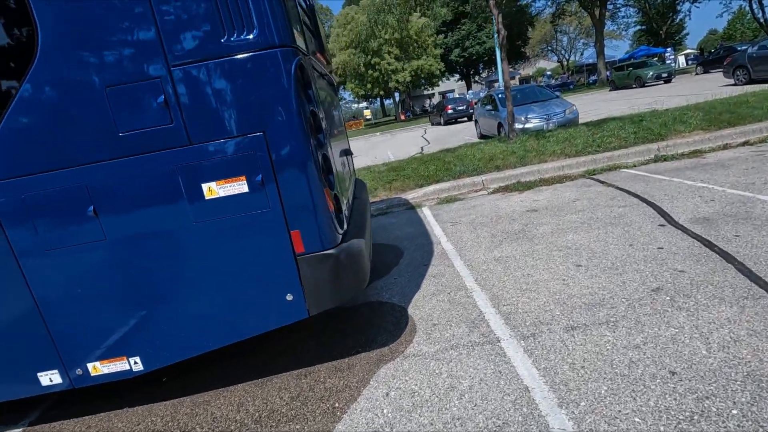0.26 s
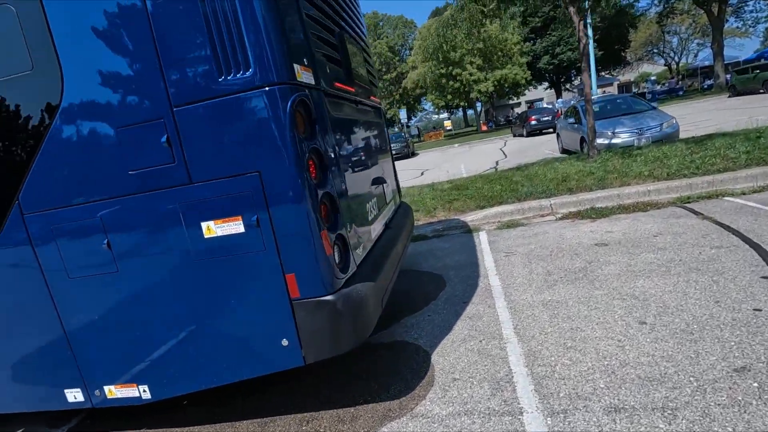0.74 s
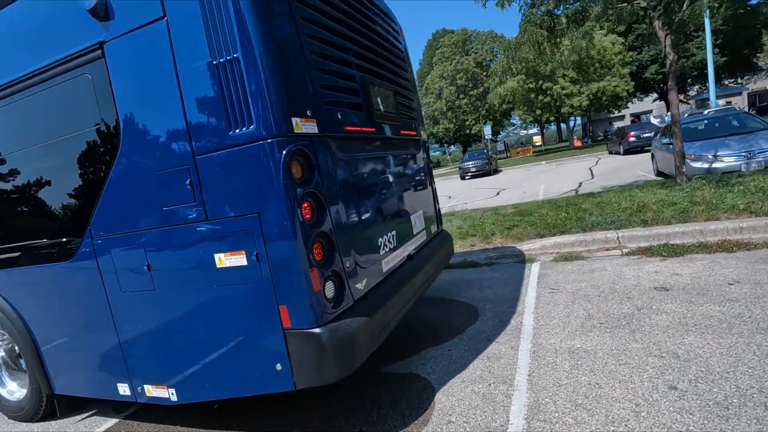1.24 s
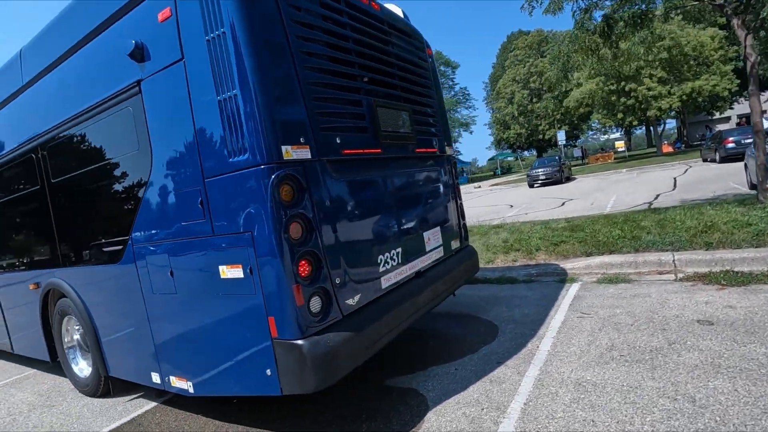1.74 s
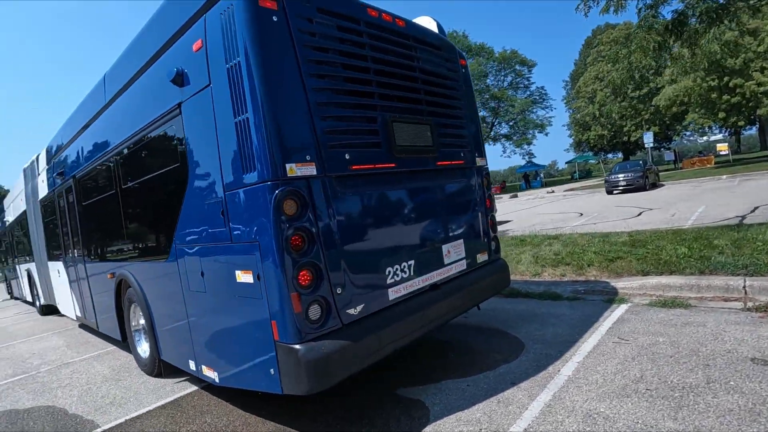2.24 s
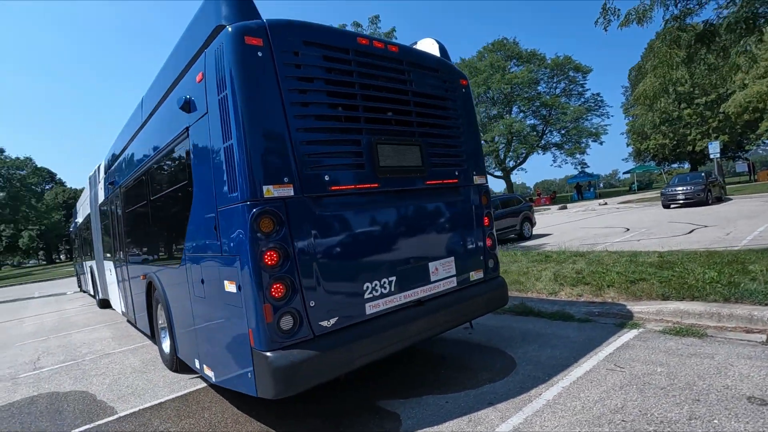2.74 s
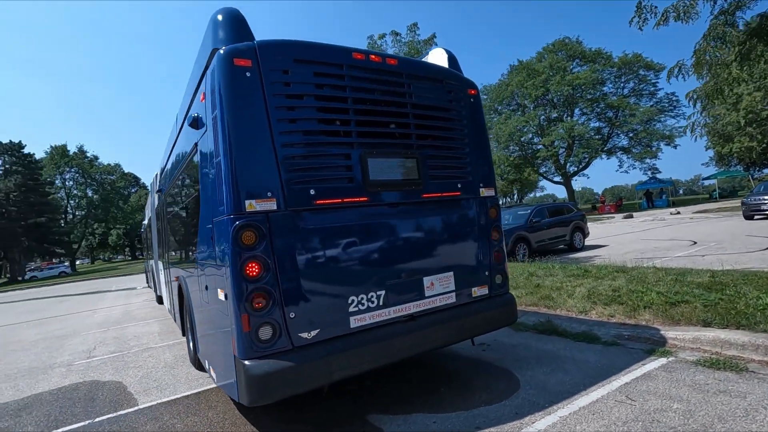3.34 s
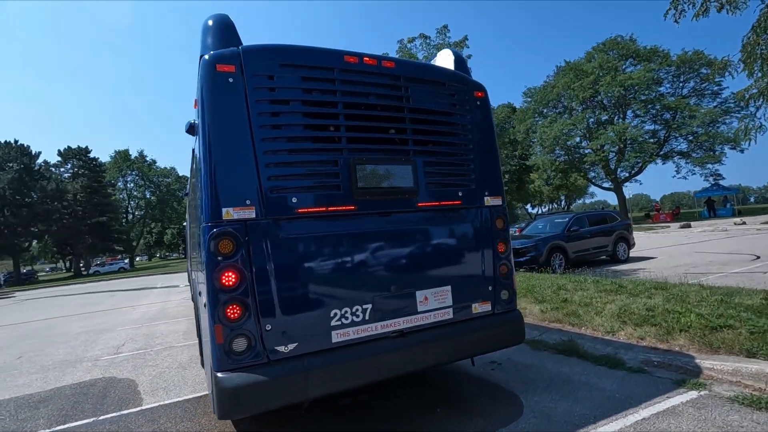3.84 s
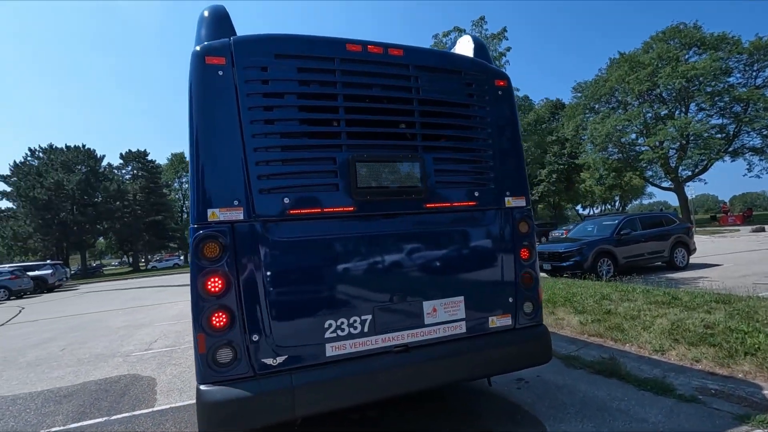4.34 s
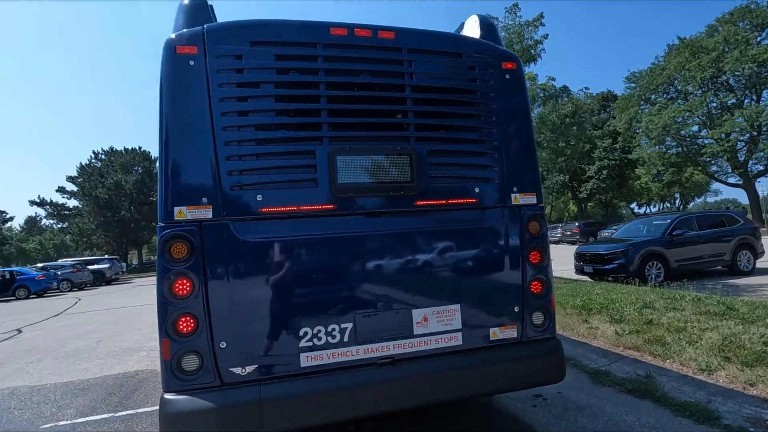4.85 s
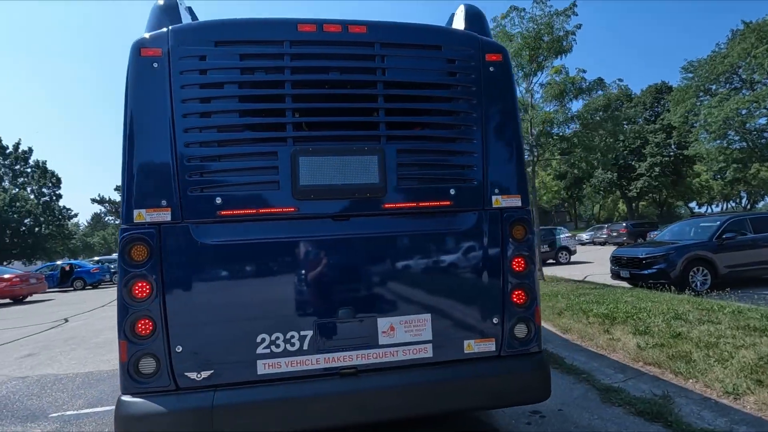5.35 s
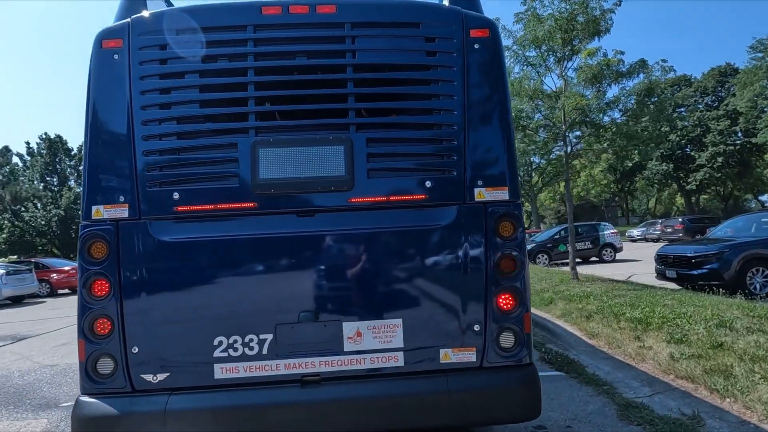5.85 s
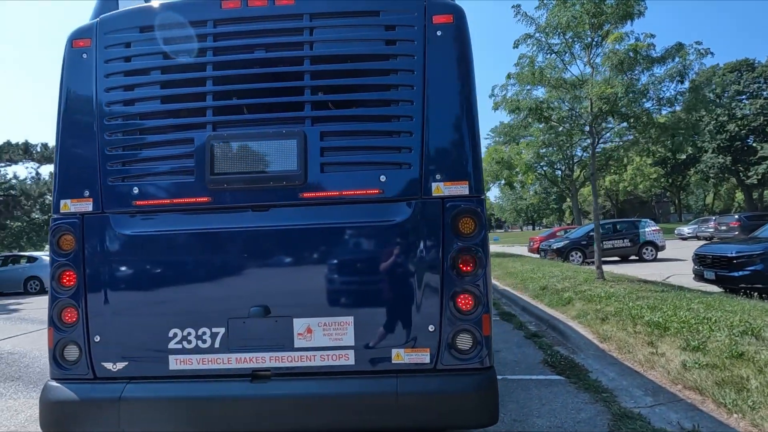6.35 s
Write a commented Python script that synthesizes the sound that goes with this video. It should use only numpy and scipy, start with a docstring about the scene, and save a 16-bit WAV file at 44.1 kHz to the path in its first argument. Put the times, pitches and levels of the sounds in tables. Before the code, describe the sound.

Low motor drone and rushing compressor beside a standing bus, one short hiss and wind buffeting, then the roar dies to a soft fan whir.

```python
"""A parked electric bus, heard on a walk round its tail: sines of motor and blower, with slow chance wavering.
An air compressor roars as filtered noise with casing resonances, until it cuts out and dies away;
cooling fans whir as noise ringing in a grille. Asphalt adds one short echo to compressor and fans.
A valve puffs once early on, a noise jet with singing pipe resonances and a blurred echo.
Wind buffets the microphone as low noise with surges and flaps; a very faint high hiss swells now and then."""
import sys
import numpy as np
from scipy import signal
from scipy.io import wavfile
from scipy.ndimage import uniform_filter1d

SR = 44100
rng = np.random.default_rng(int(sys.argv[2]) if len(sys.argv) > 2 else 0)


def bounce(signal):
    """Save signal as a 16-bit WAV file at the path given by the first command-line argument."""
    frames = np.transpose(np.atleast_2d(signal))
    limited = np.clip(frames, -1, 1)
    pcm = np.round(limited * 32767).astype(np.int16)
    wavfile.write(sys.argv[1], SR, pcm)


N = 290619
T = np.arange(N) / SR
CUT_OUT_S = 3.19   # compressor stops


def from_db(db):
    """Gain of a level in dB."""
    return 10 ** (np.asarray(db) / 20)


def rms_one(x):
    """Scaled to rms 1."""
    return x / np.sqrt(np.mean(x ** 2) + 1e-20)


def in_time(rows):
    """Columns of a curve table, one value a sample."""
    s, *columns = np.transpose(rows)
    return [np.interp(T, s, c) for c in columns]


def drift(rate_hz):
    """Slow chance of spread 1: noise through two equal poles at SR / 40, changing about rate_hz times a second."""
    r = np.exp(-80 * np.pi * rate_hz / SR)
    noise = rng.standard_normal(N // 40 + 2002)
    slow = signal.lfilter([1], [1, -2 * r, r * r], noise)[2000:]   # settled part
    return np.interp(np.arange(N) / 40, np.arange(len(slow)), rms_one(slow))


def whistle(hz, width_hz):
    """Noise through a narrow two-pole resonance, rms 1."""
    r = np.exp(-np.pi * width_hz / SR)
    poles = [1, -2 * r * np.cos(2 * np.pi * hz / SR), r * r]
    return rms_one(signal.lfilter([1, 0, -1], poles, rng.standard_normal(N)))


def resonances(rows):
    """Sum of noise resonances from (centre [Hz], width [Hz], level [dB])."""
    return sum(from_db(db) * whistle(hz, width_hz) for hz, width_hz, db in rows)


def banded_noise(spectrum, pivot_hz, tilt_db_per_oct=0, together_db=.5, own_db=.5, rate_hz=8.0):
    """Third-octave noise bands with shared and own flicker, tilted about a pivot; rms 1 before tilt and flicker."""
    hz_points, db_points = np.transpose(spectrum)
    octaves = np.log2(min(hz_points[-1], 17000) / hz_points[0])
    edges_hz = hz_points[0] * 2 ** np.arange(0, octaves, 1 / 3)
    white = rng.standard_normal((2, N + SR))   # neighbouring bands take turns; the first second settles the filters
    together = drift(rate_hz)
    out, power = 0, 0
    for k, (low_hz, high_hz) in enumerate(zip(edges_hz, edges_hz[1:])):
        bandpass = signal.butter(3, [low_hz, high_hz], "band", fs=SR, output="sos")
        band = signal.sosfilt(bandpass, white[k % 2])[SR:]
        hz = np.sqrt(low_hz * high_hz)
        band = band * from_db(np.interp(np.log(hz), np.log(hz_points), db_points))
        power += np.mean(band ** 2)
        tilt_db = tilt_db_per_oct * np.log2(hz / pivot_hz)
        out = out + band * from_db(tilt_db + together_db * together + own_db * drift(rate_hz))
    return out / np.sqrt(power)


def swelling(rows):
    """Sum of exponential peaks, a quick rise and a slower fall, from (time [s], peak [dB], fall [s], ...)."""
    rise_per_fall = 0.45
    total = 0
    for s, db, fall_s, *_ in rows:
        age_s = np.where(T > s, T - s, (s - T) / rise_per_fall)
        total = total + from_db(db) * np.exp(-age_s / fall_s)
    return total


def high_hiss():
    """Very faint noise band at the top, with short throbbing swells of a slightly wider band."""
    # swells over the steady hiss: (start [s], end [s], level [dB])
    hiss_swells = [(1.286, 1.582, -84), (1.627, 1.705, -91), (2.56, 2.9, -86), (4.177, 4.409, -84),
                   (4.505, 4.58, -82)]
    steady_db, edge_s = -89, .02

    def band(low_hz, high_hz):
        """Band-passed noise, rms 1."""
        bandpass = signal.butter(6, (low_hz, high_hz), "band", fs=SR, output="sos")
        return rms_one(signal.sosfilt(bandpass, rng.standard_normal(N)))

    swells = sum(from_db(db) * np.clip(np.minimum(T - start_s, end_s - T) / edge_s, 0, 1)
                 for start_s, end_s, db in hiss_swells)
    steady = from_db(steady_db + 1.5 * drift(6.0)) * band(11600, 14200)
    return steady + swells * from_db(2.5 * drift(40.0)) * band(11500, 15600)


def wind():
    """Lumpy low turbulence, buffeting and surges above it, and one gust whose flaps tear up into the mids."""
    # mean levels on the microphone: (time [s], rumble [dB], buffeting [dB])
    wind_levels = [(0.0, -33, -28), (0.22, -29.5, -36.5), (0.37, -23, -28.5), (0.52, -19, -28),
                   (0.68, -19, -36), (0.9, -25, -30.5), (1.1, -23, -29.5), (1.28, -22, -30),
                   (1.45, -26.5, -39.5), (1.6, -27, -29.5), (1.82, -31.5, -36), (1.95, -26, -33),
                   (2.4, -25.5, -29.5), (2.8, -26, -30.5), (3.08, -27, -36), (3.25, -29, -33),
                   (3.4, -33, -38.5), (3.75, -39.5, -36.5), (4.16, -36.5, -32), (4.3, -40.5, -43.5),
                   (4.48, -40.5, -47.5), (4.95, -39.5, -42.5), (5.1, -33.5, -41.5), (5.3, -38, -42.5),
                   (5.75, -34, -42.5), (6.0, -39, -42), (6.59, -31.5, -45)]
    # spectrum of the rumble: (frequency [Hz], density [dB per Hz])
    rumble_spectrum = [(18, -1), (30, 1), (50, -1.5), (80, -6), (120, -12)]
    # spectrum of the buffeting: (frequency [Hz], density [dB per Hz])
    buffet_spectrum = [(70, 6.5), (110, 0.5), (170, -2.5), (220, -5), (265, -16), (330, -28.5),
                       (500, -26.5)]
    # heavier surges: (time [s], peak [dB], fall [s])
    surge_peaks = [(0.36, -23.5, 0.053), (0.46, -25, 0.053), (0.74, -31.5, 0.045), (1.01, -33, 0.036),
                   (1.29, -22.5, 0.032), (1.42, -22, 0.052), (1.66, -33, 0.049), (2.46, -28.5, 0.12),
                   (3.04, -27, 0.079), (3.18, -33, 0.018), (4.255, -32.5, 0.017), (5.1, -33, 0.027)]
    # spectrum of the surges: (frequency [Hz], density [dB per Hz])
    surge_spectrum = [(60, 0), (100, -2), (170, -3), (240, -7), (310, -22.5), (420, -24)]
    # flaps of a sharper gust tearing past the port: (time [s], peak [dB], fall [s], ring [Hz])
    flap_peaks = [(3.519, -42.5, 0.021, 294), (3.656, -33.5, 0.03, 340), (3.706, -42, 0.021, 330),
                  (3.781, -38.5, 0.021, 378), (3.836, -33.5, 0.021, 562), (3.881, -38.5, 0.03, 377),
                  (3.925, -40.5, 0.032, 231), (3.979, -49, 0.015, 493), (4.014, -49, .012, 360),
                  (4.032, -42.5, 0.023, 355), (4.092, -43, 0.014, 302), (4.141, -36, 0.015, 470),
                  (4.153, -41.5, 0.02, 390)]
    # spectrum of the flaps: (frequency [Hz], density [dB per Hz])
    flap_spectrum = [(90, -7.5), (200, 4), (400, 0), (570, -4), (720, -8), (900, -13), (1200, -24)]
    lumps_db, lumps_hz = 2.8, 8.0   # chance swells of the turbulence
    rumble_brightening, buffet_darkening = 0.26, 0.2   # dB per octave for each dB of growth
    thud_db = -7   # ring of each flap against its noise

    rumble_db, buffet_db = in_time(wind_levels)
    rumble_db = rumble_db + lumps_db * drift(lumps_hz)
    buffet_db = buffet_db + lumps_db * drift(lumps_hz)
    rumble_tilt = rumble_brightening * (rumble_db + 25)
    buffet_tilt = -buffet_darkening * (buffet_db + 13.5)
    rumble = from_db(rumble_db) * banded_noise(rumble_spectrum, 30, rumble_tilt, .6, 1.0, 16.0)
    buffet = from_db(buffet_db) * banded_noise(buffet_spectrum, 165, buffet_tilt, 1.2, 1.0, 16.0)
    surges = swelling(surge_peaks) * banded_noise(surge_spectrum, 170, 0, 1.5, 1.5, 25.0)
    gust = swelling(flap_peaks) * banded_noise(flap_spectrum, 400, 0, 1.0, .8, 40.0)
    thuds = sum(swelling([row]) * np.sin(2 * np.pi * row[3] * (T - row[0])) for row in flap_peaks)
    return rumble + buffet + surges + gust + from_db(thud_db) * np.sqrt(2) * thuds


def asphalt(x):
    """One bounce off the ground, its lag and brightness changing with the walk, combs the spectrum."""
    # ground echo: (time [s], extra path [ms], share of treble kept [0-1])
    ground_path = [(0, 1.0, .3), (.75, 1.1, .3), (1.3, 1.0, .4), (1.65, .98, .7), (2.0, .92, .2),
                   (2.3, .95, .3), (2.6, 1.02, .7), (2.9, 1.04, .9), (3.2, 1.01, 1.0), (3.5, 1.02, .8),
                   (3.9, 1.1, .3), (6.59, 1.1, .3)]
    echo_db, treble_from_hz = -10, 5000
    lag_ms, treble_share = in_time(ground_path)
    dull = signal.filtfilt(*signal.butter(2, treble_from_hz, fs=SR), x)
    bounced = dull + treble_share * (x - dull)
    return x + from_db(echo_db) * np.interp(T - lag_ms / 1000, T, bounced)


def valve():
    """A jet of air that sets the pipe resonances singing while it is strong; a blurred echo follows."""
    # spectrum of the jet: (frequency [Hz], density [dB per Hz])
    jet_spectrum = [(530, -25), (900, -18), (1400, -4), (2530, -10), (3450, 3.5), (3890, -8.5), (4230, -6),
                    (5500, -8.5), (7390, -16.5), (9800, -30), (11500, -36), (14000, -38), (15500, -50)]
    # pipe resonances, relative levels: (centre [Hz], width [Hz], level [dB])
    pipe_resonances = [(1375, 35, -1), (1820, 35, -4), (2160, 30, -1), (3150, 30, -5), (3500, 25, -1),
                       (3700, 35, -6), (4095, 26, -1), (4630, 35, -7), (5080, 60, -8), (5530, 50, -9)]
    puff_s, puff_db, attack_s, hold_s = 0.246, -37, 0.012, 0.034
    fast_db_per_s, slow_db_per_s, slow_part_db = 107, 68, -3   # fast fall first, slow after
    opening_dull_db, brightening_s = -9, .03   # tilt per octave as the valve opens
    falling_dull = 0.4   # dB per octave for each dB of fall
    wall_s, wall_db, smear_s = .15, -15, .09   # echo from across the lot

    gate = np.clip((T - puff_s) / attack_s, 0, 1) ** 2
    falling_s = np.maximum(T - puff_s - attack_s - hold_s, 0)
    fall_db = np.maximum(-fast_db_per_s * falling_s, slow_part_db - slow_db_per_s * falling_s)
    strength = gate * from_db(puff_db + fall_db)

    opening_tilt = opening_dull_db * np.clip(1 - (T - puff_s) / brightening_s, 0, 1)
    falling_tilt = falling_dull * np.maximum(fall_db, -12)
    jet = banded_noise(jet_spectrum, 2500, opening_tilt + falling_tilt, 1.0, 1.5, 40.0)
    singing = from_db(-3.5 + .4 * fall_db) * rms_one(resonances(pipe_resonances))

    smeared = uniform_filter1d(strength, int(smear_s * SR))
    back = np.interp(T - wall_s, T, smeared, left=0)
    echo = from_db(wall_db) * back * banded_noise(jet_spectrum, 4000, .5, .8, 1.2, 30.0)
    return strength * (jet + singing) + echo


def fans():
    """Air noise of the cooling fans, ringing in the grille; it grows once the tail is reached."""
    # spectrum of the whir: (frequency [Hz], density [dB per Hz])
    whir_spectrum = [(160, -49.5), (280, -30), (358, 0), (433, -19), (493, -6), (554, -7), (596, -24),
                     (720, -15), (808, -15.5), (1130, -12), (1900, -19.5), (2370, -24), (2900, -25),
                     (3710, -27.5), (9000, -55), (11700, -89.5), (19800, -120)]
    # grille resonances, relative levels: (centre [Hz], width [Hz], level [dB])
    grille_resonances = [(369, 7.8, -5.5), (515, 14, -11), (543, 23, -4), (711, 23, -11)]
    start_db, tail_s, nearing_db_per_s = -50.5, 3.1, 1.25
    grille_db, air_cut_hz = -3.5, 8470

    level_db = start_db + nearing_db_per_s * np.maximum(T - tail_s, 0)
    air = banded_noise(whir_spectrum, 1000, 0, 0.075, 0.55, 8.4)
    air = air + from_db(grille_db) * resonances(grille_resonances)
    cut = signal.butter(16, air_cut_hz, fs=SR, output="sos")
    return from_db(level_db) * signal.sosfilt(cut, air)


def compressor():
    """Broad roar with casing and outlet resonances; after cut-out it dies away, the roar's treble first."""
    # spectrum of the roar: (frequency [Hz], density [dB per Hz])
    roar_spectrum = [(150, -14), (250, -5), (314, -10.5), (448, -1.5), (544, -18), (650, -10.5),
                     (716, -13.5), (1040, -15.5), (1500, -18.5), (2600, -28.5), (3200, -28.5),
                     (4600, -34.5), (5500, -40), (6200, -41.5), (7750, -47), (9000, -54.5), (10500, -61),
                     (12000, -74), (15600, -99), (22000, -120)]
    # casing resonances against the roar: (centre [Hz], width [Hz], level [dB])
    casing_resonances = [(425, 30, -15), (460, 51, -5), (599, 75, -9), (1244, 120, -20), (1840, 270, -20.5)]
    start_db, nearing_db_per_s, nearest_s = -44, 2.5, 2.33   # grows on the walk until nearest
    start_tilt, brightening_per_s = -0.02, 0.11   # dB per octave; outlet coming into view
    t60_s, dulling = 1, 0.062   # run-down; dB per octave for each dB of it
    outlet_hz, outlet_width_hz, outlet_db, outlet_db_per_s = 2070, 270, -37, 6.5   # against the roar
    roar_cut_hz = 8700

    roar_db = start_db + nearing_db_per_s * np.minimum(T, nearest_s)
    dying_db = -60 * np.maximum(T - CUT_OUT_S, 0) / t60_s
    tilt = start_tilt + brightening_per_s * T + dulling * np.maximum(dying_db, -40)
    roar = banded_noise(roar_spectrum, 1300, tilt, 1.0, 0.24, 14.0)
    casing = resonances(casing_resonances)
    outlet_level_db = outlet_db + outlet_db_per_s * np.minimum(T, CUT_OUT_S)
    outlet = from_db(outlet_level_db) * whistle(outlet_hz, outlet_width_hz)
    cut = signal.butter(5, roar_cut_hz, fs=SR, output="sos")
    return from_db(roar_db + dying_db) * signal.sosfilt(cut, roar + casing + outlet)


def orders(turn_rad, rows, waver_db, wobble_rad):
    """Sines on (order, level [dB]) of a turning phase, each wavering in level and phase."""
    total = 0
    for order, db in rows:
        phase = order * turn_rad + wobble_rad * drift(3.55) + rng.uniform(0, 2 * np.pi)
        total = total + from_db(db + waver_db * drift(5.2)) * np.sin(phase)
    return total


def motor():
    """Sines on shaft orders and blower tones; freed of the compressor's load the shaft speeds up a little."""
    # blower along the walk: (time [s], main tone [Hz], main tone [dB], upper tones' reference [dB])
    blower_tones = [(0, 232, -38, -50), (.5, 231.2, -38, -52), (1.1, 231.3, -41, -61),
                    (1.65, 229.3, -34, -52), (2.4, 228.8, -32, -52), (2.9, 230, -34, -52),
                    (3.15, 232, -35, -52.5), (3.35, 235, -43, -57.5), (4.1, 238.5, -45, -52),
                    (4.35, 238.5, -48.5, -51), (5.0, 238.5, -51, -51), (5.5, 239, -58, -51),
                    (5.9, 240.5, -57, -49), (6.59, 242, -57, -47)]
    # shaft orders, relative levels: (order, level [dB])
    shaft_orders = [(1, 0), (2, -11), (3, -15), (8, -28), (9, -27)]
    # blower tones above the main one, relative levels: (ratio, level [dB])
    upper_ratios = [(1.5, -5), (2, -16)]
    loaded_hz, free_hz, spin_up_s = 57.2, 58.1, 0.2
    loaded_db, free_db, higher_lift_db = -31.5, -40, 2   # the lift, once freed, is for orders above the first
    top_clear_s, top_lift_db, top_fade_s = 5.2, 6, 0.37   # top blower tone stands out square behind the tail
    side_ratio, side_db, side_left_db = 7.21, -48.5, -8   # tied to shaft; drops at the corner, gone after cut-out
    corner_s, corner_fade_s = 0.72, 0.15

    freed = 1 - np.exp(-np.maximum(T - CUT_OUT_S, 0) / spin_up_s)
    shaft_rad = 2 * np.pi * np.cumsum(loaded_hz + (free_hz - loaded_hz) * freed) / SR
    first = orders(shaft_rad, shaft_orders[:1], 3 - 1.5 * freed, 1 - .7 * freed)
    higher = orders(shaft_rad, shaft_orders[1:], 3.0, .7)
    low_db = loaded_db + (free_db - loaded_db) * freed
    low = from_db(low_db) * (first + from_db(higher_lift_db * freed) * higher)

    blower_hz, main_db, upper_db = in_time(blower_tones)
    blower_rad = 2 * np.pi * np.cumsum(blower_hz) / SR
    main = from_db(main_db) * orders(blower_rad, [(1, 0)], 1.0, .12)
    middle = orders(blower_rad, upper_ratios[:1], 3.2, 1.0)
    lift_db = top_lift_db * np.clip((T - top_clear_s) / top_fade_s, 0, 1)
    top = from_db(lift_db) * orders(blower_rad, upper_ratios[1:], 2.0, .9)
    upper = from_db(upper_db) * (middle + top)

    past_corner = np.clip((T - corner_s) / corner_fade_s + 1, 0, 1)
    beside = (1 - freed) * from_db(side_left_db * past_corner)
    side_tone = beside * orders(shaft_rad, [(side_ratio, side_db)], 1.6, 0.4)
    return np.sqrt(2) * (low + main + upper + side_tone)   # levels are rms


def scene():
    """The bus with its ground echo, wind and the high hiss."""
    return (motor() + asphalt(compressor() + fans()) + valve() + wind() + high_hiss())[None]


def record(dry):
    """The top is cut steeply, 40 dB down from 15650 Hz."""
    return signal.sosfilt(signal.cheby2(16, 40, 15650, fs=SR, output="sos"), dry)


dry = scene()
out = record(dry)
bounce(out)
```